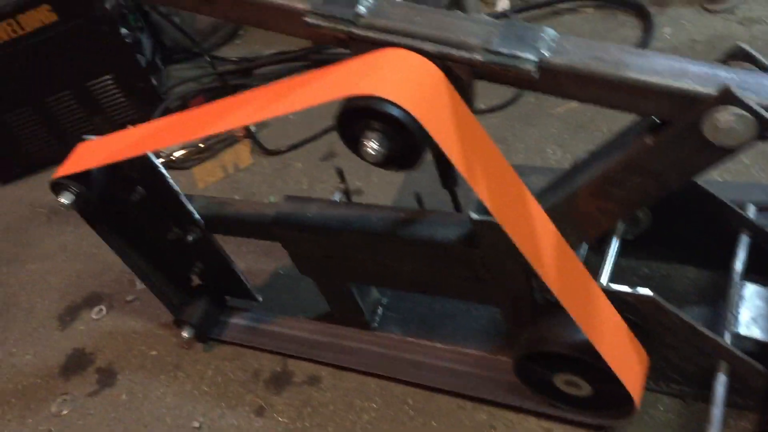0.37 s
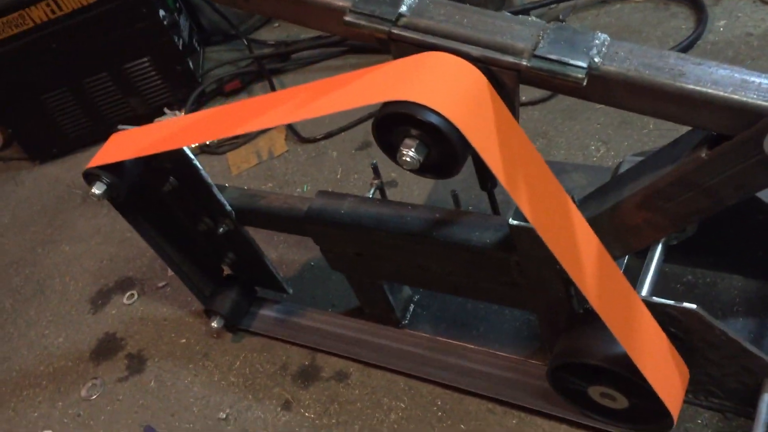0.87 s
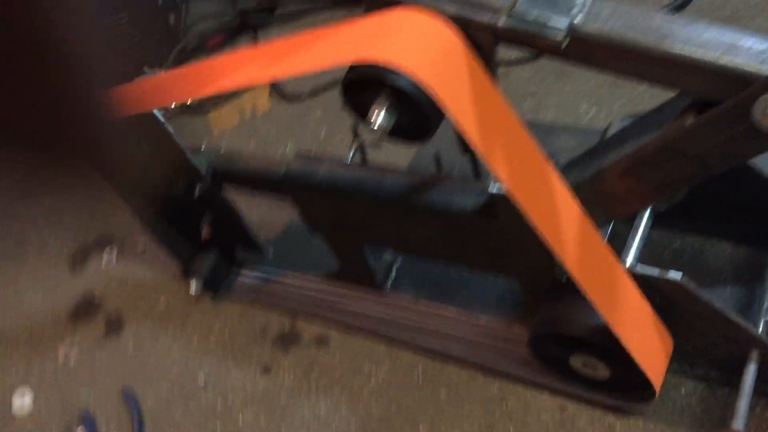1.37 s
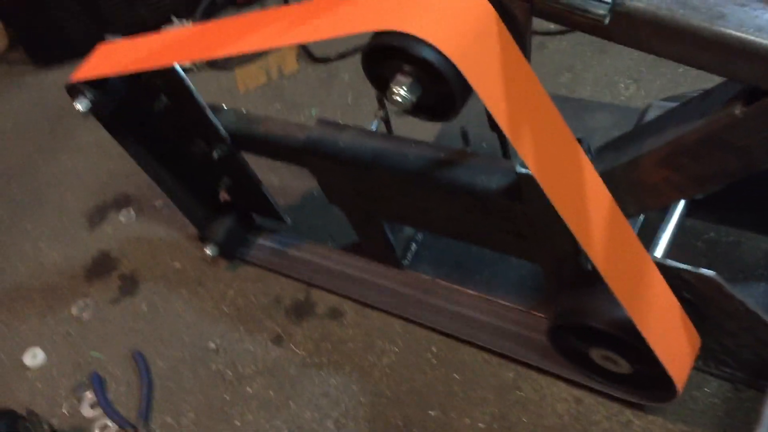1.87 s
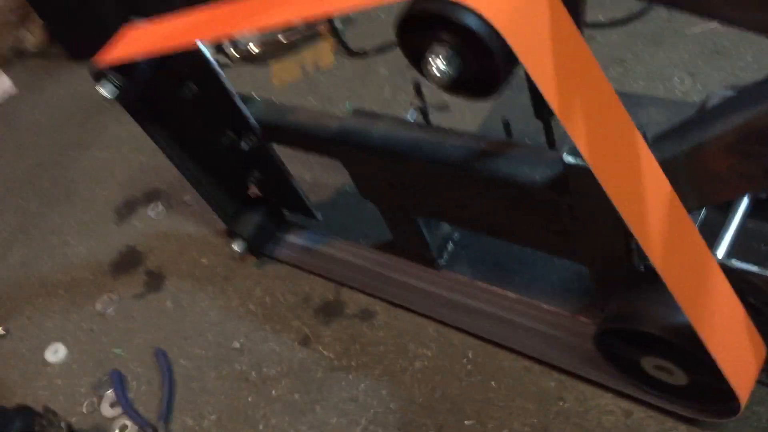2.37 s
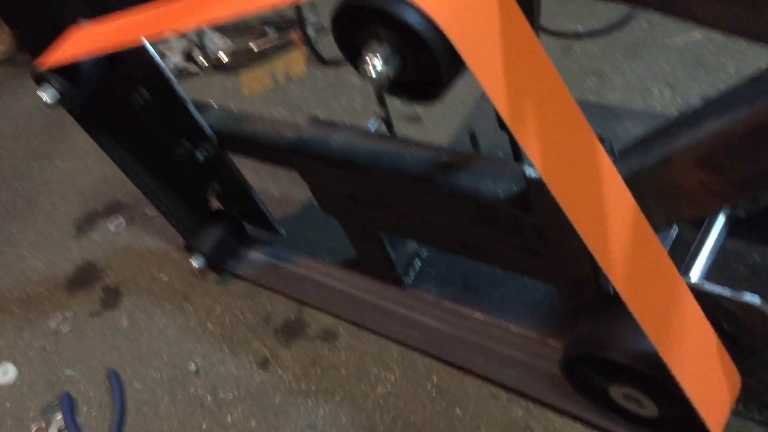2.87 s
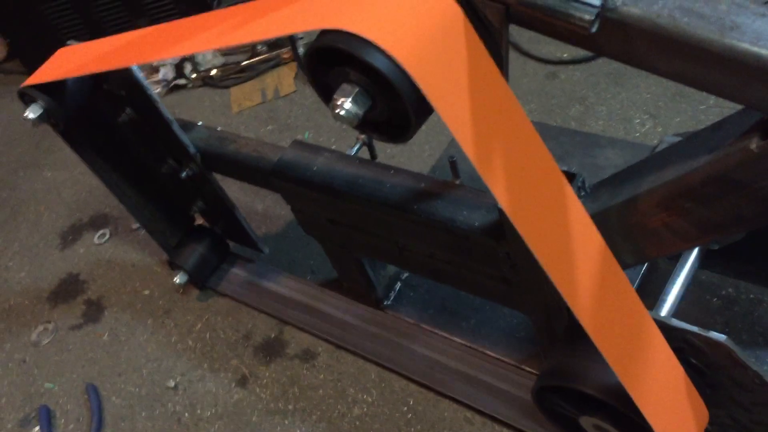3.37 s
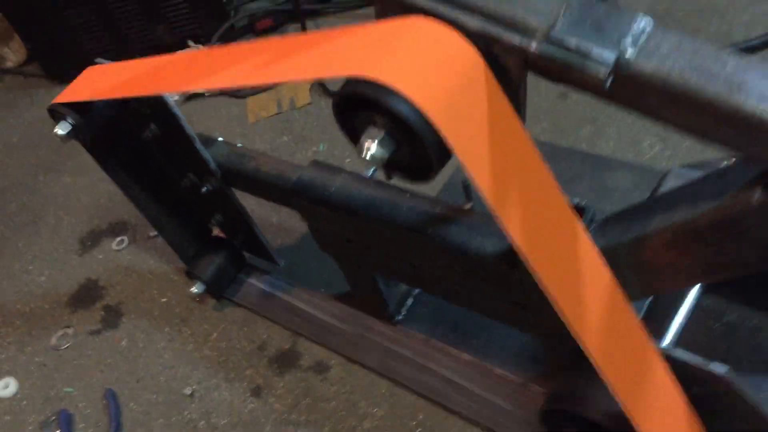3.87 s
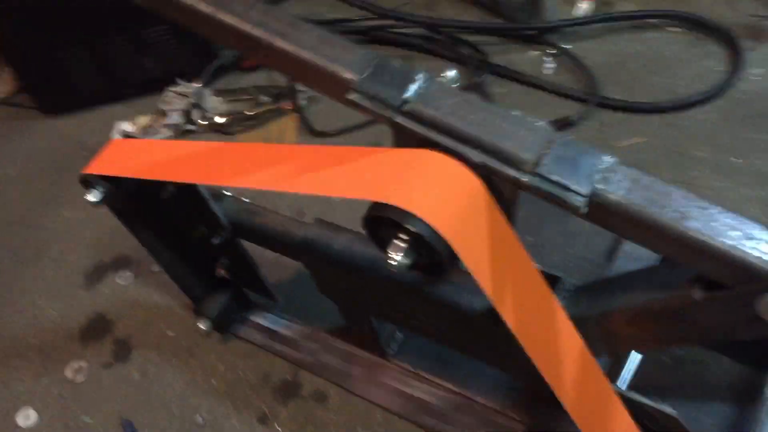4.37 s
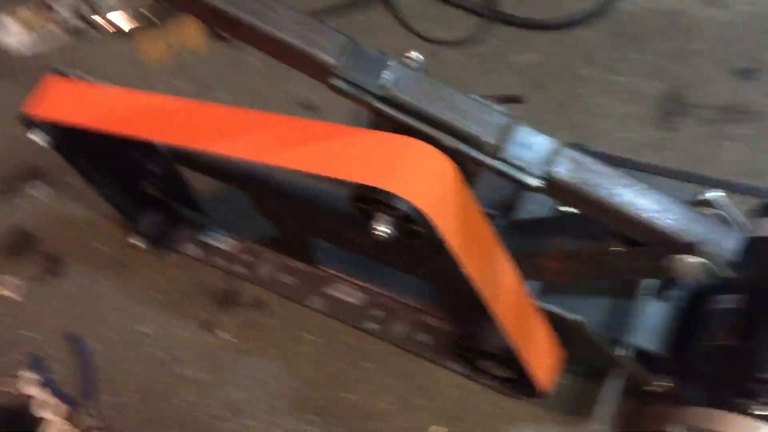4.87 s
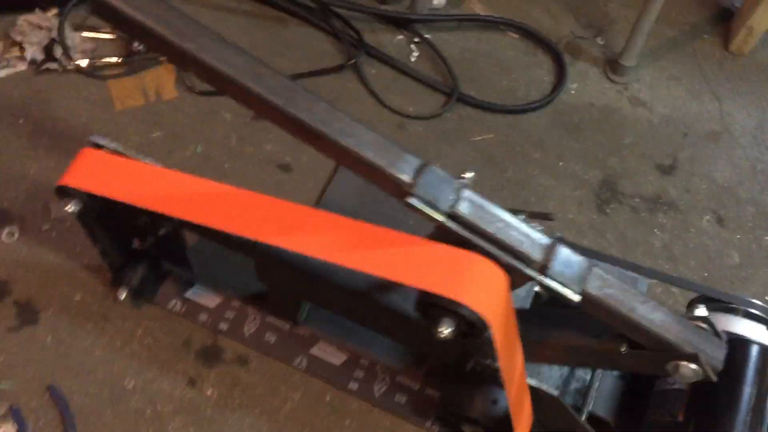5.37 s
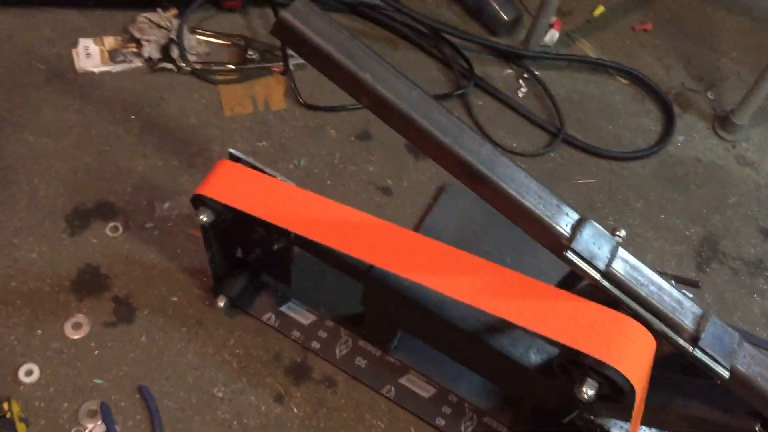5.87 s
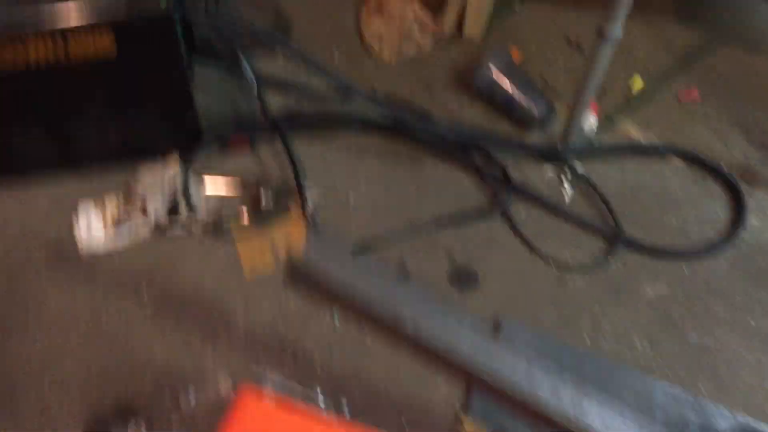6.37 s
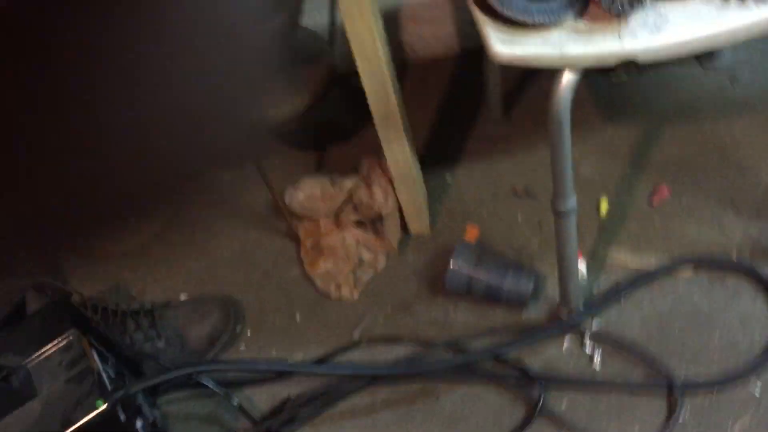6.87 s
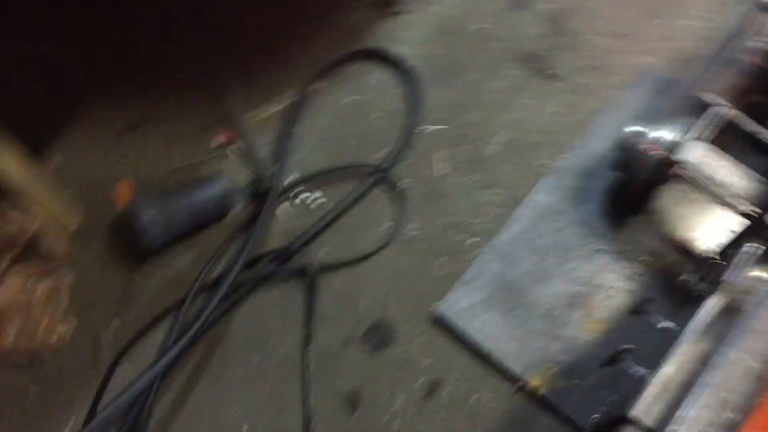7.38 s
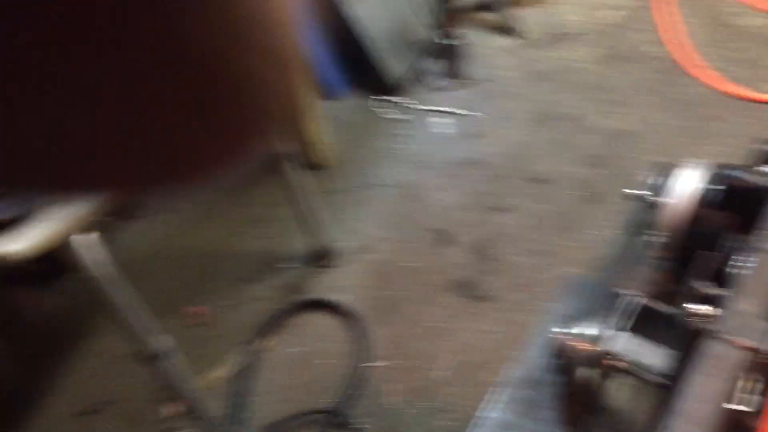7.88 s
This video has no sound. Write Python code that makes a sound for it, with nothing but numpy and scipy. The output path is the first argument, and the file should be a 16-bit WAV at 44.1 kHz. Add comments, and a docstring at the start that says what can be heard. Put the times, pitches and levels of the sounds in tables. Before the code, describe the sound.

From 0 to about 3.4 seconds a homemade belt grinder runs loudly and close: a dense buzzing, whining chord from the rollers, broad rushing belt hiss with airy fizz, a quick flutter about thirteen times a second, and rapid fine ticks. The whine wavers slightly as the handheld microphone moves. At 3.4 the power is cut; pitch slides down, treble fades, ticks slow, and the machine stops near 4.9. Knocks and a click begin around 4.2, with a cluster of shoe knocks and scuffs near 5. At 5.6 a steel piece falls, striking hardest at 5.65 and bouncing until 6.1 with a clattering ring. From 6.4 come dull metal knocks and short singing slides, then a tiny ping near 7. A thud at 7.2, clicks around 7.6, a scuff with cloth rustle at 7.9 and last knocks after 8 follow, over faint hum, hush, low rumble and handling bumps.

```python
"""Workshop with a concrete floor, one hand-held microphone near a home-built belt grinder, 8 s.
The grinder runs: rollers whine as families of tones, the belt hisses as shaped noise, the drive wheel ticks.
At 3.4 s the power is cut and it coasts down; from 4.2 s shoes knock and scuff as struck resonances and gritty noise.
At 5.6 s a steel piece falls and bounces, ringing its modes; from 6.4 s it is knocked flat and slides; at 7 s
a small metal part pings. Room hush, hum, low rumble and jolts on the microphone lie under it."""
import sys
import numpy as np
from scipy import signal
from scipy.fft import rfft, irfft, next_fast_len
from scipy.io import wavfile
from scipy.ndimage import uniform_filter1d, map_coordinates

SR = 44100
rng = np.random.default_rng(int(sys.argv[2]) if len(sys.argv) > 2 else 0)


def invert_db(level):
    """Linear amplitude ratio for a level in decibels (20 dB per decade), elementwise."""
    return 10 ** (np.asarray(level, dtype=float) / 20)


def wav_record(signal):
    """Record a signal, one row per channel, as 16-bit PCM in the file named by sys.argv[1]."""
    frames = np.transpose(np.atleast_2d(signal))
    bounded = np.clip(frames, -1, 1)
    # unit amplitude maps onto the largest positive 16-bit level
    quanta = np.round(bounded * 32767).astype(np.int16)
    wavfile.write(sys.argv[1], SR, quanta)


N = 363825

# The machine's loudness at the microphone. Each row: time in seconds, level in dB re full running.
LOUDNESS = [(0, -0.5), (1.22, 0), (1.33, -1.5), (1.7, -0.45), (1.8, 0), (2.2, -0.5), (2.6, 0.16),
            (3.4, -0.5), (3.65, -2.5), (4.1, -4), (4.27, -6), (4.46, -11), (4.69, -19.5), (4.86, -38),
            (4.91, -55)]
# The whine at the moving microphone. Each row: time in seconds, level in dB, tilt in dB per octave about 1.2 kHz.
WHINE = [(0, 1.3, 1.5), (.5, -2.5, 3.5), (.9, 0, 2), (1.25, -0.6, 2), (1.4, -3, 1.5), (1.65, -1, 0),
         (1.8, 1.5, 0), (2.1, -0.5, 0.5), (2.3, 0.5, 0.5), (2.7, 1.5, 0), (3.1, -1.5, 0.5), (3.35, 1, -1.5),
         (3.5, 1, -0.5), (3.7, -3, 4.5), (4.05, -10, -5), (4.28, -10, -4.5), (4.4, -6.5, -11),
         (4.6, -8, -6), (4.9, -50, -4)]
# Families of tones at full speed: a base in Hz, then rows. Each row: multiple of the base, level in dB
# before the swells and the frame. In turn: roller flats, whole roller, bearing, drive wheel.
FLATS = 561.05, [(1, -34.5), (2, -41), (3, -34.5), (4, -36.5), (5, -35.5), (6, -37.5), (7, -35), (8, -33.5),
         (9, -39.5), (10, -40)]
ROLLER = 93.7, [(2, -57), (3, -51), (4, -53), (10, -47), (11, -42), (12, -43), (13, -42), (14, -47),
          (15, -46), (18, -31.5), (33, -44)]
BEARING = 383.6, [(1, -44), (2, -47), (3, -34.5)]
WHEEL = 37.9, [(6, -56), (7, -53), (8, -57), (11, -52), (13, -55), (14, -50), (17, -49), (24, -49)]
# Swell of each family once a belt lap, in dB: flats, roller, bearing, wheel; plus = loudest when running fast.
LAP_SWELL_DB = 1.9, -1.9, -0.7, 0.79
# The frame that the whine passes through. Each row: frequency in Hz, width in Hz, level in dB.
FRAME = [(215, 12, 3.7), (257, 19, 9.7), (333, 23, 6), (483, 42, 11.9), (857, 70, 4.2), (1129, 110, 6),
         (1305, 63, 3.7), (1583, 110, 4.3), (1950, 64, 3)]
# The belt's low rumble, its rush at full speed, its rush when coasting and its treble fizz.
# Each row: frequency in Hz, relative level in dB per Hz.
RUMBLE = [(35, -60.5), (60, -38), (102, -21), (155, -15.5), (268, -10.5), (426, -6), (553, 0), (619, -6),
          (718, -8.5), (900, -10), (1170, -42.5), (1980, -120)]
RUSH = [(410, -45.5), (700, -13), (1000, -5.5), (1300, -1.5), (1800, -1.5), (2050, -4.5), (2500, -4.5),
        (3000, -5.5), (3700, 0), (4300, -1.5), (4800, -2.5), (5400, -1.5), (6800, -8), (8800, -42),
        (15000, -120)]
COAST_RUSH = [(410, -34), (700, -3), (823, -13.5), (977, -4.5), (1250, -2.5), (3030, -13.5), (3880, -7),
              (4870, -20), (6800, -20.5), (8840, -44.5), (15000, -120)]
FIZZ = [(3650, -34.5), (6200, -2.5), (7340, -0.5), (9310, 0.5), (10500, -5), (13600, -4), (15100, -5.5),
        (15800, -22.5)]
# The plate struck by the tick. Each row: frequency in Hz, width in Hz, level in dB.
PLATE = [(2730, 330, 0)]
# Modes of the steel piece. Each row: frequency in Hz, relative level in dB, t60 in seconds before contacts damp it.
STEEL_MODES = [(390, -0.5, 1.5), (437, 1.5, 1.1), (655, 7, 0.57), (707, -1, 0.33), (926, 3.5, 1.1),
               (986, -6, 0.25), (1194, -3, 0.17), (1448, -5.5, 0.7), (1430, -5.5, 1.7), (1502, -10, .25),
               (1590, -6.5, 0.53), (1850, -15, 0.5), (1910, -16.5, 0.38), (2077, -26, 0.21),
               (2264, 2, 0.19), (2340, -6, 0.26), (2686, -23.5, 0.24), (3060, -8, 0.27), (3250, -20, 0.12),
               (3550, -1, 0.098), (3890, -12.5, 0.18), (4170, -22, 0.13), (4500, -21, .3), (4530, -28, 0.2)]
# Bounces of the steel. Each row: time in seconds, relative blow in dB, ring over the blow in dB,
# tilt in dB per octave.
BOUNCES = [(5.575, -27, -6, 4), (5.595, -27, -2, 3.5), (5.649, -11.5, -2.5, 2), (5.734, -25.5, 2.5, 9),
           (5.849, -41, 6.5, -8.5), (5.881, -20.5, -1.5, 7.5), (5.909, -23, 2.5, -1.5),
           (6.112, -23.5, -3.5, 4.5), (6.139, -37, 6.5, -2)]
# Colour of the rattle in each bounce. Each row: frequency in Hz, relative level in dB per Hz.
CLATTER = [(180, -38), (300, -7), (958, -5), (1130, -15), (1430, -8.5), (4710, -21), (15800, -51.5)]
# How the rattle dies. Each row: frequency in Hz, t60 in seconds.
CLATTER_T60 = [(500, 0.47), (2000, 0.49), (5000, 0.33), (12000, 0.32)]
# The piece knocked flat on the floor. Each row: time in seconds, relative blow in dB.
FLAT_BLOWS = [(6.358, -36), (6.525, -49), (6.613, -42), (6.81, -49)]
# The piece's damped answer. Each row: frequency in Hz, width in Hz, level in dB.
FLAT_STEEL = [(430, 130, 5), (646, 220, 9), (950, 230, -5)]
# Slides of the piece. Each row: peak in seconds, rise in seconds, fall in seconds, peak level in dB.
SLIDES = [(6.42, .04, .06, -52), (6.51, .04, .09, -48.5), (6.64, .03, .05, -50), (6.675, .03, .04, -55)]
# Where the sliding piece sings. Each row: frequency in Hz, width in Hz, level in dB.
SINGS = [(655, 27, 1), (940, 30, -10), (1435, 30, -3), (1550, 35, -3)]
# The small metal part. Each row: frequency in Hz, relative level in dB, t60 in seconds.
PING_MODES = [(953, -6, .08), (1880, 0, .16), (1915, -3, .1), (2640, -7, .08), (3990, -6, .05)]
# Soles and small things touching down. Each row: time in seconds, relative knock in dB,
# thud over the knock in dB, click over the knock in dB.
KNOCKS = [(4.243, -29.5, -6, 14), (4.618, -30, -6, -9.5), (4.806, -49.5, 3, -2), (4.82, -52, -7, 1.5),
          (4.873, -46, -12.5, -9), (4.918, -39, -15, -22), (4.94, -41, 2.5, -19.5),
          (4.946, -32, -14.5, -17.5), (4.964, -45, 0, -12), (5.006, -42.5, 6.5, -23), (5.21, -70, -6.5, -9),
          (5.3, -53.5, 9, -14), (5.468, -54, -14.5, -15.5), (6.358, -44.5, 7, -25), (6.401, -54, -6, 5.5),
          (6.613, -37, -14, -20), (6.63, -47, 4, -20), (6.683, -60, -6, 2), (6.959, -41.5, -8.5, -12.5),
          (7.164, -31, 7, -16.5), (7.319, -57.5, 5.5, 12), (7.554, -58, -13, -15.5), (7.613, -38, -22, -14),
          (7.628, -32.5, -25, -3.5), (8.074, -39.5, 12.5, -12), (8.096, -50, 20, -15),
          (8.142, -37.5, -12, -8), (8.203, -49, -14, -13)]
# The floor under a sole, the shoe itself and small hard parts.
# Each row: frequency in Hz, width in Hz, level in dB.
SLAB = [(243, 59, 4.5), (332, 55, 4), (535, 310, -8)]
SHOE = [(816, 280, -7), (1340, 630, 0), (1850, 120, -3)]
HARD = [(3850, 1600, -0.5), (8180, 3100, -10)]
# Soles dragging. Each row: peak in seconds, rise in seconds, fall in seconds, peak level in dB,
# bright over dull in dB.
SCUFFS = [(4.955, 0.065, 0.081, -46, -12), (5.02, 0.075, 0.084, -49, -20), (5.065, 0.024, .015, -50, -18.5),
          (5.303, 0.0053, 0.11, -52, -21.5), (5.52, .08, 0.051, -66, -20), (6.361, .005, 0.16, -48, -32),
          (6.52, 0.26, 0.37, -50, -7.5), (6.7, 0.19, 0.038, -57, -2.5), (6.775, .03, 0.043, -54.5, -6.5),
          (6.82, 0.05, 0.093, -52, -14), (6.963, 0.004, 0.062, -48, -8.5),
          (7.168, 0.0047, 0.14, -42.5, -14.5), (7.321, .004, 0.096, -61, 3.5),
          (7.392, 0.2, 0.061, -61, -16), (7.6, .04, .04, -57, -9), (7.636, 0.023, 0.072, -56.5, 8),
          (7.865, 0.23, 0.17, -41, -3.5), (7.93, .15, 0.17, -51, 1), (8.079, 0.0051, 0.033, -39, -16),
          (8.143, .004, 0.055, -51, -6)]
# Cloth brushing. Each row: peak in seconds, rise in seconds, fall in seconds, peak level in dB.
RUSTLES = [(4.99, .06, 0.2, -60), (5.24, .015, .04, -74.5), (5.335, .06, .04, -65), (7.85, 0.2, 0.14, -49),
           (7.93, .1, 0.11, -59)]
# Dull, bright and airy friction noise. Each row: frequency in Hz, relative level in dB per Hz.
DULL = [(88, -24), (150, -8), (367, -7), (823, -13.5), (897, -12.5), (989, -11.5), (2800, -21),
        (3640, -24.5), (6160, -120)]
BRIGHT = [(1290, -11), (2200, 5), (2450, -0.5), (4110, 3.5), (6230, -3), (7000, -35), (9100, -43.5),
          (15400, -120)]
AIRY = [(4000, -25), (6800, 5), (7140, -9), (8740, 0.5), (10300, -6.5), (13700, -1), (15800, -15)]
# How the workshop's reverberation dies. Each row: frequency in Hz, t60 in seconds.
SHOP = [(200, 0.51), (2000, 0.26), (6000, 0.26), (14000, 0.063)]
# Room hush, hum, low rumble (also the shaken floor) and deep rumble.
# Each row: frequency in Hz, relative level in dB per Hz.
HUSH = [(120, -22.5), (200, -1), (316, -0.5), (472, -0.5), (760, -5.5), (863, -3.5), (1900, -10),
        (2150, -10.5), (13200, -24.5), (15800, -31)]
HUM = [(90, -120), (108, -11.5), (121, -1), (134, -14), (160, -120)]
LOW = [(53, -47.5), (90, -20.5), (113, -5.5), (145, -3), (230, -6), (300, -21), (510, -120)]
DEEP = [(15, -37.5), (25, -8), (54, -2.5), (70, -0.5), (91, -5.5), (100, 6.5), (130, -29), (220, -120)]
# Jolts of the hand on the microphone. Each row: time in seconds, relative push in dB.
JOLTS = [(4.98, -48), (5.115, -51), (5.303, -48), (5.478, -38.5), (5.67, -52), (6.15, -52), (6.352, -45),
         (6.795, -51), (7.27, -49), (7.425, -48), (7.78, -45), (8.06, -52)]
# The hand and the microphone case. Each row: frequency in Hz, width in Hz, level in dB.
GRIP = [(62, 26, 0)]

LAP_HZ = 12.9  # belt laps a second at full speed


def unit(x):
    """Scaled to rms 1."""
    return x / np.sqrt(np.mean(x ** 2) + 1e-20)


def along(points, hz):
    """Reads (Hz, value) points on a log frequency axis."""
    f, v = np.transpose(points)
    return np.interp(np.log(hz + 1), np.log(f + 1), v)


def curves(rows, outside=None):
    """One value per sample for each column after the time."""
    s, *columns = np.transpose(rows)
    return [np.interp(np.arange(N) / SR, s, column, outside, outside) for column in columns]


def wobble(rate):
    """A random curve of straight pieces, rate knots a second."""
    knots = rng.standard_normal(int(N * rate / SR) + 4)
    return map_coordinates(knots, [np.arange(N) * rate / SR], order=1)


def filtered(x, response):
    """x times a response given as a function of frequency in Hz."""
    m = next_fast_len(x.shape[-1] + SR // 2)
    return irfft(rfft(x, m) * response(np.fft.rfftfreq(m, 1 / SR)), m)[..., :N]


def resonant(x, peaks):
    """x through parallel causal resonances (Hz, width Hz, dB) of alternating sign."""
    def response(f):
        return sum((-1) ** k * invert_db(db) * 1j * f * width / (centre * centre - f * f + 1j * f * width)
                   for k, (centre, width, db) in enumerate(peaks))
    return filtered(x, response)


def noise(spectrum, patchy_db, grit_db):
    """Coloured noise of rms 1 with patches of random gain in time and frequency, and spiky grit."""
    gritty = rng.standard_normal(N) * invert_db(grit_db * wobble(1500))
    z = signal.stft(gritty, nperseg=512)[2]
    field = uniform_filter1d(rng.standard_normal(z.shape), 6, axis=0)
    field = uniform_filter1d(field, 10, axis=1)
    x = signal.istft(z * invert_db(patchy_db * unit(field)), nperseg=512)[1][:N]
    return unit(filtered(x, lambda hz: invert_db(along(spectrum, hz))))


def dying(t60s):
    """Half a second of noise, energy 1, each frequency dying at its own speed."""
    hz, t, z = signal.stft(rng.standard_normal(SR // 2), SR, nperseg=256)
    tail = signal.istft(z * invert_db(-60 * t / along(t60s, hz)[:, None]), SR, nperseg=256)[1]
    return tail / np.linalg.norm(tail)


def swells(rows):
    """Summed gain of (peak s, rise s, fall s, dB) swells."""
    edge_db, roundness = 29, 1.33  # loss at the ends of rise and fall; 1 pointed, 2 round
    out, t = np.zeros(N), np.arange(N) / SR
    for s, rise, fall, db in rows:
        near = slice(max(round((s - 3 * rise) * SR), 0), round((s + 3 * fall) * SR))
        away = np.where(t[near] < s, (s - t[near]) / rise, (t[near] - s) / fall)
        out[near] += invert_db(db - edge_db * away ** roundness)
    return out


def speed():
    """Share of full speed: after the power cut, drag and dry friction slow the belt to a stop."""
    power_off_s, drag_s, friction = 3.365, 1.2, 0.2  # friction as a share of full speed
    off = np.clip(np.arange(N) / SR - power_off_s, 0, None)
    return np.clip((1 + friction) * np.exp(-off / drag_s) - friction, 0, 1)


def turns():
    """Seconds of full-speed running done so far."""
    return np.cumsum(speed()) / SR


def follows(full_db, slope):
    """Gain of a machine layer: full_db at full running, then slope dB for each dB of loudness."""
    return invert_db(full_db + slope * curves(LOUDNESS, outside=-200)[0])


def whine():
    """Every tone follows the speed, bends and swells once a belt lap, and wavers slowly by itself."""
    in_step_s = 1.76  # the tones drift in and out of step around here
    lap_wow_s, jitter_s = 0.000153, 0.000022  # the belt joint's early-late running; fast random running
    break_up_db, past_frame_db = 4, -8  # at rest: extra waver; level of tones that miss the resonances
    run, share, heard = turns(), speed(), np.zeros(N)
    level_db, tilt_db = curves(WHINE)
    lap = 2 * np.pi * LAP_HZ * run
    bent = run - in_step_s + lap_wow_s * np.sin(lap) + jitter_s * wobble(60)
    phases = rng.uniform(0, 2 * np.pi, 200)  # tones in one 50 Hz step share a phase
    for (base_hz, multiples), swell_db in zip((FLATS, ROLLER, BEARING, WHEEL), LAP_SWELL_DB):
        drift = 0.049 * wobble(4.6)
        for k, db in multiples:
            hz = k * base_hz
            fade = share ** (hz / 1500)  # higher tones die sooner as the belt slows
            waver_db = 2.3 * wobble(5.094) + 0.62 * hz / 1500 * wobble(13)
            waver_db += break_up_db * np.sqrt(1 - share) * wobble(11)
            gain = fade * invert_db(db + swell_db * np.cos(lap) + tilt_db * np.log2(hz / 1200) + waver_db)
            heard += gain * np.sin(2 * np.pi * hz * bent + phases[round(hz / 50)] + np.sqrt(k) * drift)
    heard = np.sqrt(2) * heard * invert_db(level_db) * (np.arange(N) < WHINE[-1][0] * SR)
    heard = invert_db(past_frame_db * np.sqrt(1 - share)) * heard + resonant(heard, FRAME)
    return filtered(heard, lambda hz: hz ** 3 / (hz ** 3 + 170 ** 3))  # the small frame radiates no bass


def belt():
    """Noise of the belt, its rush swelling once a roller turn, on each of six flats and once a belt lap."""
    roller, lap = 2 * np.pi * ROLLER[0] * turns(), 2 * np.pi * LAP_HZ * turns()
    beat_db = 1.7 * np.cos(roller) + 1.5 * np.cos(2 * roller) + 1.4 * np.cos(6 * roller) + 0.63 * np.cos(lap)
    rumble = follows(-32.5, 0.62) * invert_db(2.2 * wobble(9)) * noise(RUMBLE, patchy_db=-2.0, grit_db=-3.0)
    slow = np.clip(1.15 * (1 - speed()), 0, 1)  # the rush dulls as the belt slows
    colour = np.sqrt(1 - slow) * noise(RUSH, patchy_db=1.15, grit_db=1.0)
    colour += np.sqrt(slow) * noise(COAST_RUSH, patchy_db=2.0, grit_db=1.0)
    rush = follows(-20.5, 0.97) * invert_db(0.35 * wobble(12)) * unit(invert_db(0.37 * beat_db) * colour)
    treble = unit(invert_db(0.35 * beat_db) * noise(FIZZ, patchy_db=0.5, grit_db=2))
    fizz = follows(-25, 1.37) * invert_db(0.45 * wobble(14)) * treble
    return rumble + rush + fizz


def ticks():
    """One uneven, slightly early or late tick per turn of the drive wheel, ringing a short plate mode."""
    one_tick_s, scatter_db = 3.365, 2.2
    every_other_db, every_fourth_db = 1.0, 1.5  # the wheel meets the belt at repeating spots
    run = turns()
    laps = np.floor(WHEEL[0] * (run - run[round(one_tick_s * SR)]))
    at = np.flatnonzero(np.diff(laps))
    late = np.round(6 * rng.standard_normal(len(at))).astype(int)  # samples
    at = np.clip(at + late, 0, N - 1)
    uneven_db = every_other_db * np.cos(np.pi * laps[at]) + every_fourth_db * np.cos(np.pi * laps[at] / 2)
    uneven_db += 1.6 * wobble(3.2)[at] + scatter_db * rng.standard_normal(len(at))
    blows = np.zeros(N)
    blows[at] = follows(18, 1.8)[at] * invert_db(uneven_db)
    return resonant(resonant(blows, PLATE), PLATE)


def falling_steel():
    """Each bounce rings the same modes at new strengths over a dense rattle; the contact colours both."""
    scatter_db, narrow_db = 2.2, 1.5  # narrow_db: loss per squared octave from about 2.2 kHz
    damps_db = 3.5  # ring lost at each later contact
    settles_s, settle_db_per_s = 6.33, 150  # the piece comes to lie flat
    out, t = np.zeros(N + 2 * SR), np.arange(SR) / SR
    top_db = np.max(np.transpose(CLATTER)[1])
    ripple_db = 4.5 * rng.standard_normal(400)  # many close, short modes, one every 60 Hz
    rocking_db = [2.5 * wobble(22) for _ in range(5)]  # it rocks on the floor: modes swell and choke
    for s, db, ring_db, tilt in BOUNCES:
        start = round(s * SR)

        def contact_db(hz):
            return tilt * np.log2(hz / 1500 + 0.054) - narrow_db * np.log2(hz / 2200 + 0.093) ** 2

        def rattle_colour(hz):
            return invert_db(along(CLATTER, hz) - top_db + contact_db(hz) + np.interp(hz / 60, np.arange(400), ripple_db))

        ring = np.zeros(len(t))
        for k, (hz, level_db, t60) in enumerate(STEEL_MODES):
            mode_db = level_db + contact_db(hz) + rng.normal(0, scatter_db) - 60 * t / t60
            mode_db = mode_db + rocking_db[k % len(rocking_db)][start:][:len(t)]
            ring += invert_db(mode_db) * np.sin(2 * np.pi * hz * t + rng.uniform(0, 2.4))
        later = sum(t > when - s for when, *_ in BOUNCES if when > s)
        damped_db = damps_db * uniform_filter1d(later + 0 * t, size=200)
        ring *= invert_db(-damped_db - settle_db_per_s * np.clip(t + s - settles_s, 0, None))
        rattle = filtered(dying(CLATTER_T60), rattle_colour)[:SR // 2]
        rattle = rattle * (1 - np.exp(-t[:SR // 2] / 0.00092))  # soft onset
        out[start:][:len(t)] += invert_db(db + ring_db - 19.5) * ring
        out[start:][:len(rattle)] += invert_db(db + 30.5) * rattle
    return out[:N]


def flat_steel():
    """Knocked flat on the floor, the piece answers with broad damped modes; sliding, it sings as narrow noise."""
    blows = np.zeros(N)
    for s, db in FLAT_BLOWS:
        blows[round(s * SR)] = invert_db(db + 35)
    singing = unit(resonant(resonant(rng.standard_normal(N), SINGS), SINGS))
    slide = swells(SLIDES) * invert_db(3.3 * wobble(40)) * singing
    return resonant(resonant(blows, FLAT_STEEL), [(620, 900, 0)]) + slide


def ping():
    """A small metal part is touched: a few dying sines."""
    start_s, level_db = 6.962, -51
    t = np.clip(np.arange(N) / SR - start_s, 0, None)
    return sum(invert_db(level_db + db - 60 * t / t60) * np.sin(2 * np.pi * hz * t) for hz, db, t60 in PING_MODES)


def knocks():
    """A push into the slab, a knock in the shoe and a few milliseconds of hard click."""
    slab_db, shoe_db, hard_db = 39, 14, 10.5  # how strongly each part answers a blow
    thuds, raps, clicks = np.zeros(N), np.zeros(N + SR), np.zeros(N + SR)
    t = np.arange(SR // 20) / SR
    for s, db, thud_db, click_db in KNOCKS:
        start = round(s * SR)
        thuds[start] = invert_db(db + thud_db + slab_db)
        raps[start:][:len(t)] += invert_db(db + shoe_db - 60 * t / 0.016) * rng.standard_normal(len(t))
        clicks[start:][:len(t)] += invert_db(db + click_db + hard_db - 60 * t / 0.019) * rng.standard_normal(len(t))
    thud = resonant(resonant(thuds, SLAB), [(400, 1600, 0)])
    knock = resonant(resonant(raps[:N], SHOE), [(1310, 2300, 0.0054)])
    click = resonant(resonant(clicks[:N], HARD), [(3970, 14000, 0)])
    return thud + knock + click


def scuffs():
    """Gritty friction noise under each drag and cloth rustle; the drag also shakes the floor."""
    dull = swells([row[:4] for row in SCUFFS])
    bright = swells([(s, rise, fall, db + over_db) for s, rise, fall, db, over_db in SCUFFS])
    airy = invert_db(-14) * bright + swells(RUSTLES)
    out = invert_db(-22) * dull * noise(LOW, patchy_db=0.0, grit_db=-4.0)
    for gain, colour in ((dull, DULL), (bright, BRIGHT), (airy, AIRY)):
        out += gain * invert_db(1.6 * wobble(70)) * noise(colour, patchy_db=2.1, grit_db=0.0)
    return out


def shop(x):
    """The workshop's reverberation; its tail changes every eighth of a second as the microphone moves."""
    out, step = np.zeros(N + 2 * SR), SR // 8
    for start in range(0, N, step):
        wet = signal.fftconvolve(x[start:start + step], dying(SHOP))
        out[start + 200:][:len(wet)] += wet  # arrives 200 samples after the direct sound
    return out[:N]


def jolts():
    """Pushes of the hand set the grip and the microphone case thumping."""
    pushes = np.zeros(N)
    for s, db in JOLTS:
        pushes[round(s * SR)] = invert_db(db + 58.5)
    return resonant(resonant(pushes, GRIP), [(70, 68, 0)])


def low_rumble():
    """Deep and low noise that wavers, stronger while the machine shakes the place."""
    shake = follows(-62, 0.082)
    deep = invert_db(-64 + 1.8 * wobble(9.1)) + shake
    low = invert_db(-66 + 4 * wobble(2.2)) + shake
    return deep * noise(DEEP, patchy_db=4.5, grit_db=3.5) + low * noise(LOW, patchy_db=-0.5, grit_db=4.0)


def hum():
    """A faint fuzzy hum: a narrow band of noise near 120 Hz."""
    return invert_db(-59.5 + 1.5 * wobble(7.8)) * noise(HUM, patchy_db=0.2, grit_db=3.5)


def hush():
    """Steady room hush as coloured noise."""
    return invert_db(-65) * noise(HUSH, patchy_db=2.5, grit_db=0.5)


def scene():
    """All sources at one microphone, the same in both channels."""
    metal, feet, tick = falling_steel() + flat_steel() + ping(), knocks(), ticks()
    reverberation = shop(invert_db(-8.0) * metal + invert_db(-8.5) * feet + invert_db(-13) * tick)
    background = jolts() + low_rumble() + hum() + hush()
    mono = whine() + belt() + tick + metal + feet + scuffs() + reverberation + background
    return np.array([mono, mono])


def low_pass(x):
    """Removes everything above the highest recorded frequency."""
    return signal.sosfilt(signal.butter(12, 17080, fs=SR, output="sos"), x)


def record(dry):
    """The microphone cuts deep bass and keeps nothing above its band limit."""
    low_cut_hz, top_hz = 45, 15800
    mix = filtered(dry, lambda hz: (hz < top_hz) * hz ** 2 / (hz ** 2 + low_cut_hz ** 2))
    return low_pass(mix)


dry = scene()
out = record(dry)
wav_record(out)
```